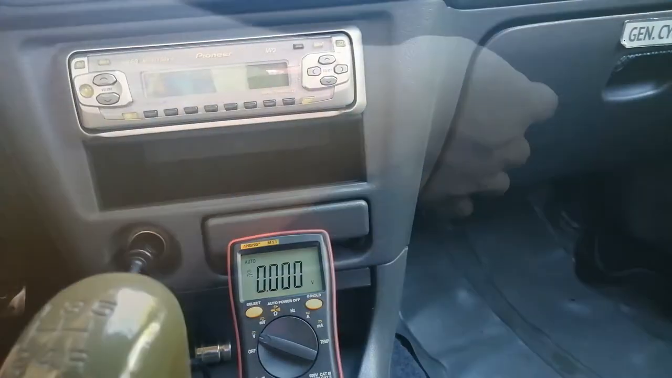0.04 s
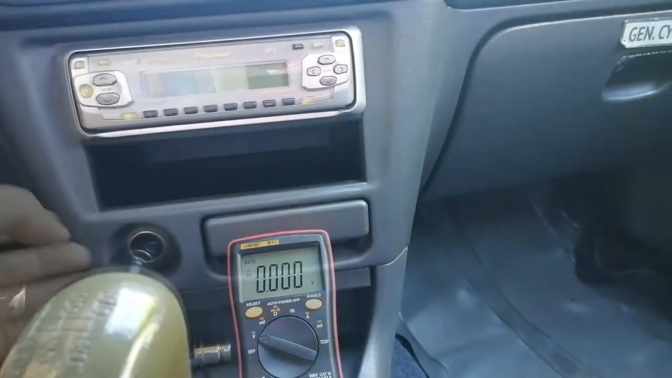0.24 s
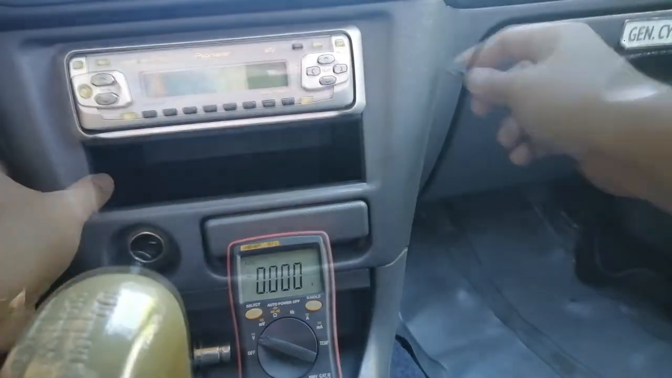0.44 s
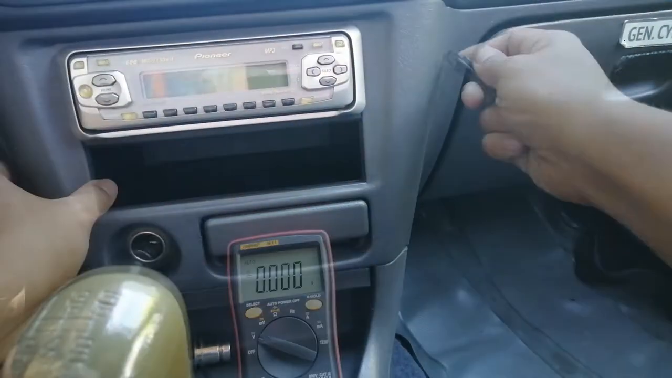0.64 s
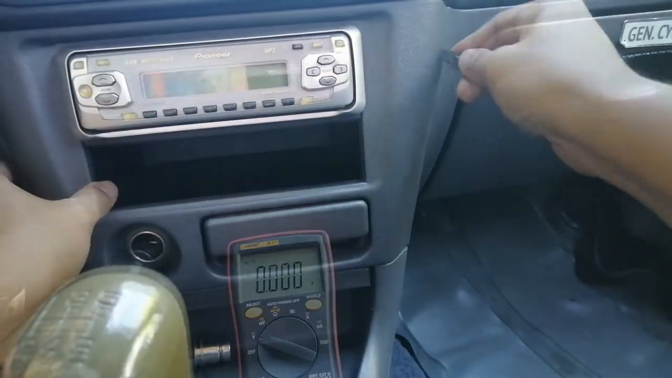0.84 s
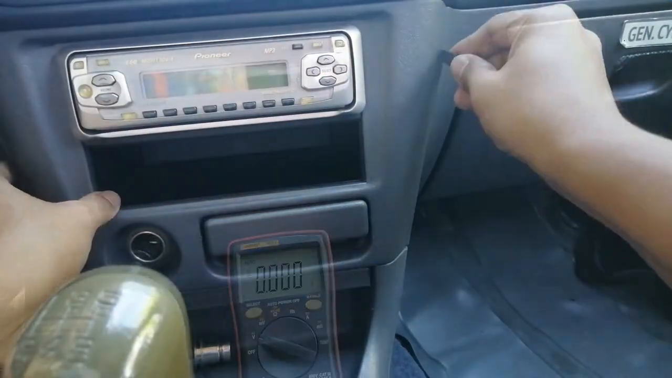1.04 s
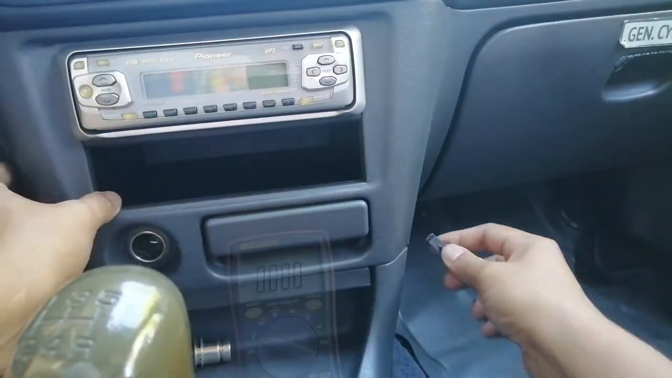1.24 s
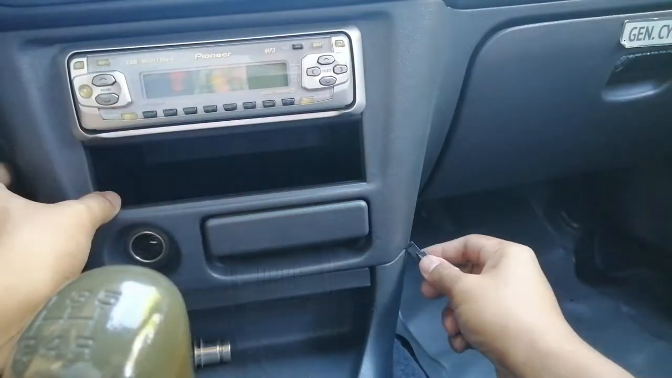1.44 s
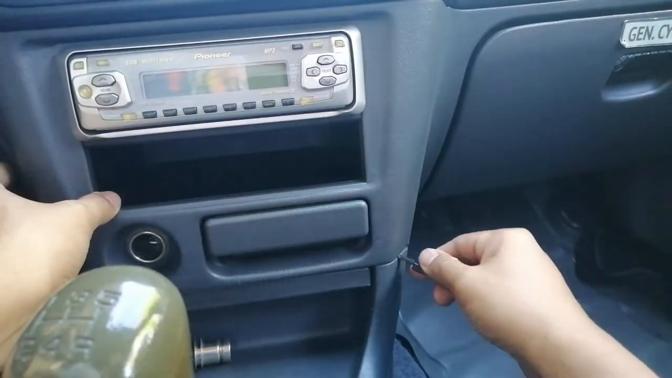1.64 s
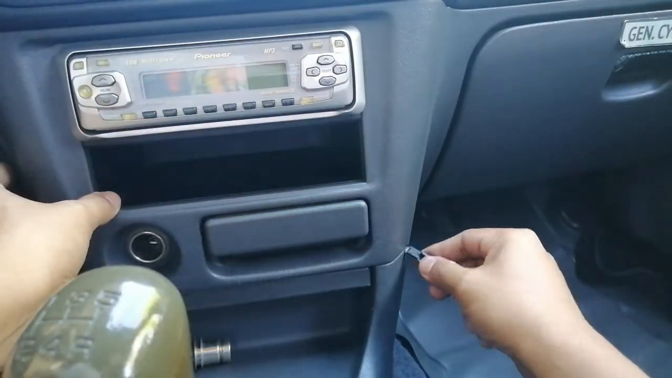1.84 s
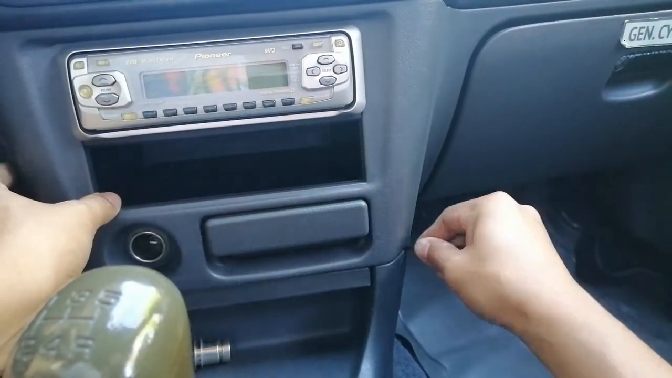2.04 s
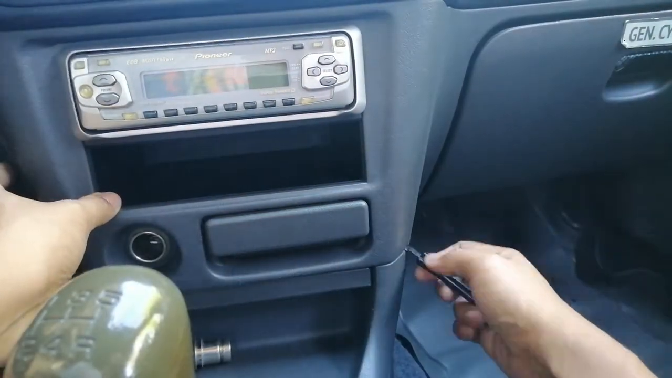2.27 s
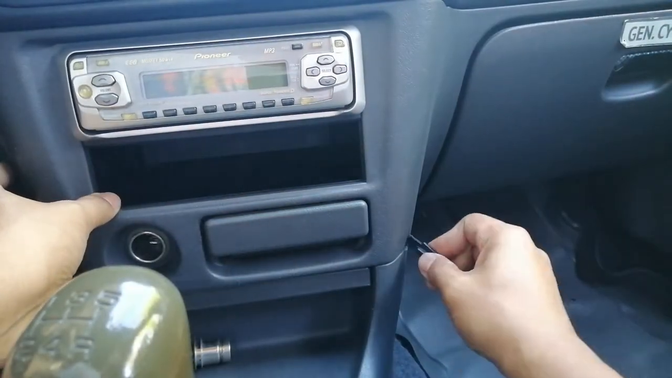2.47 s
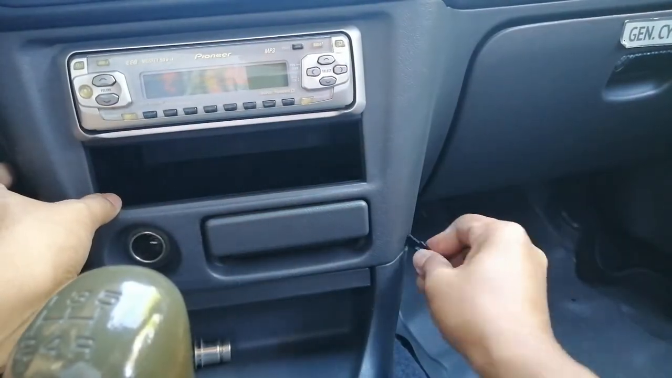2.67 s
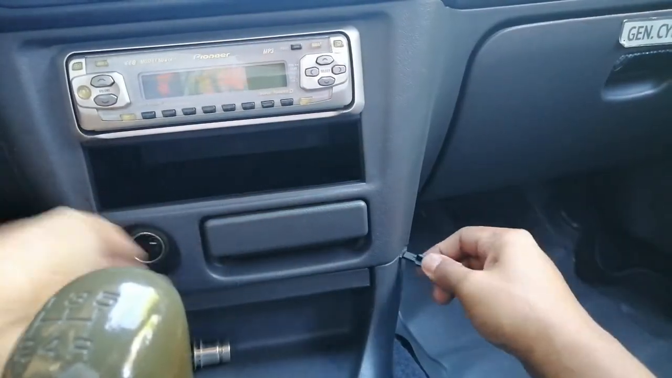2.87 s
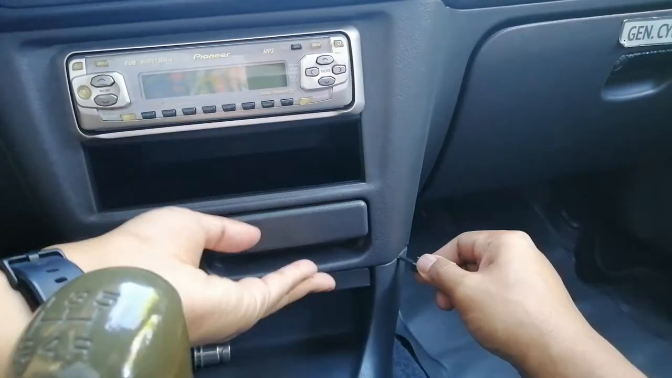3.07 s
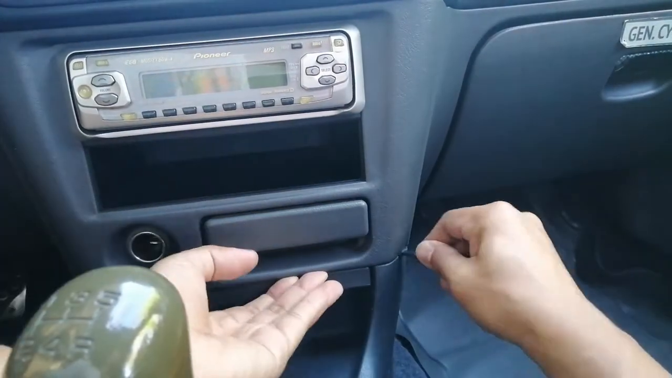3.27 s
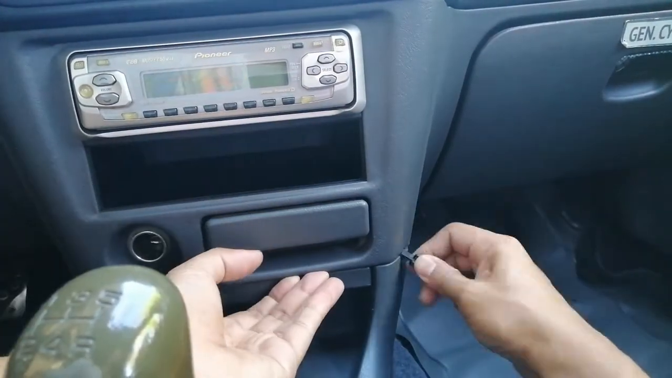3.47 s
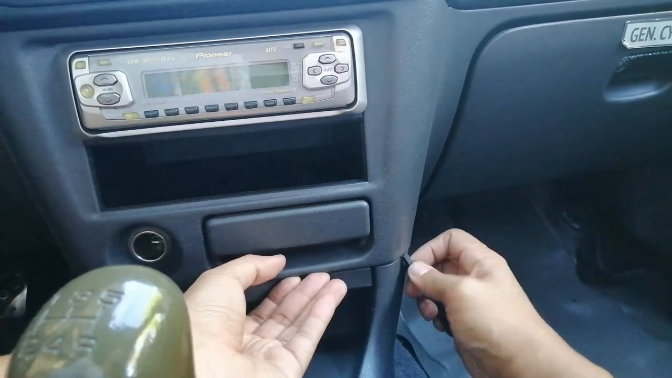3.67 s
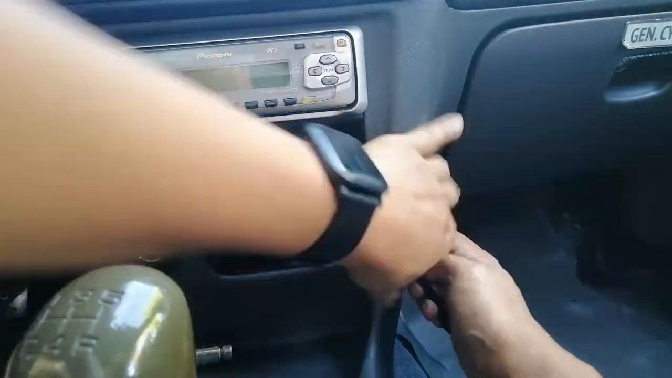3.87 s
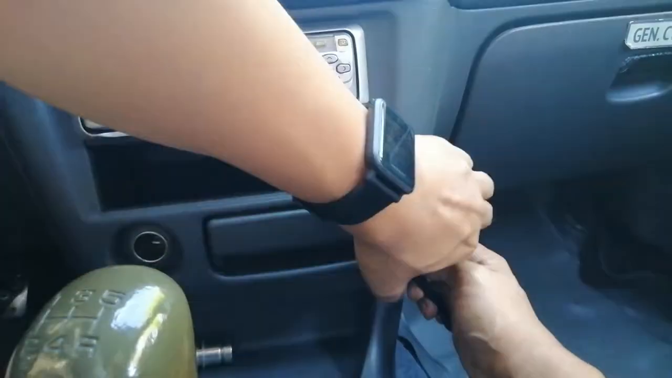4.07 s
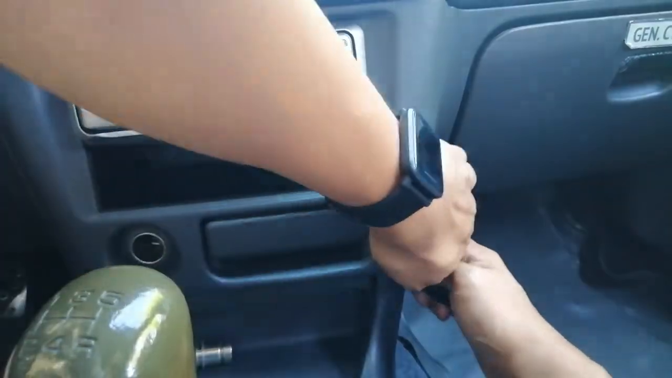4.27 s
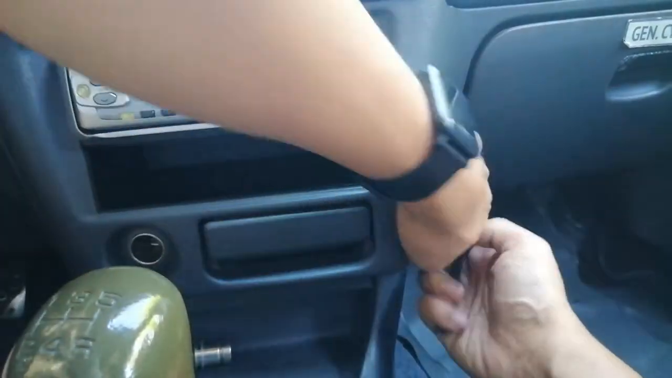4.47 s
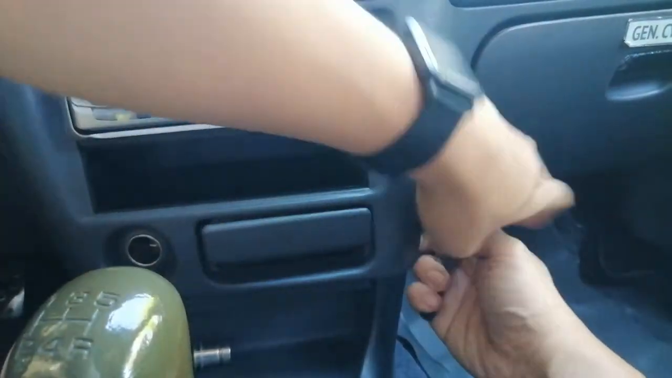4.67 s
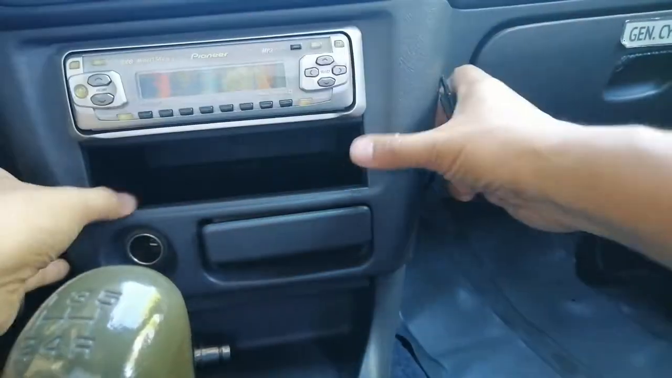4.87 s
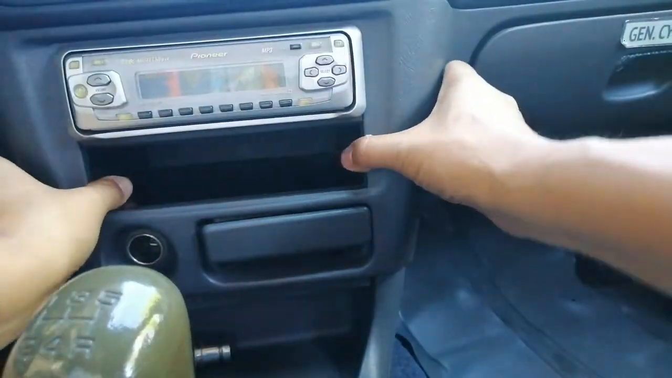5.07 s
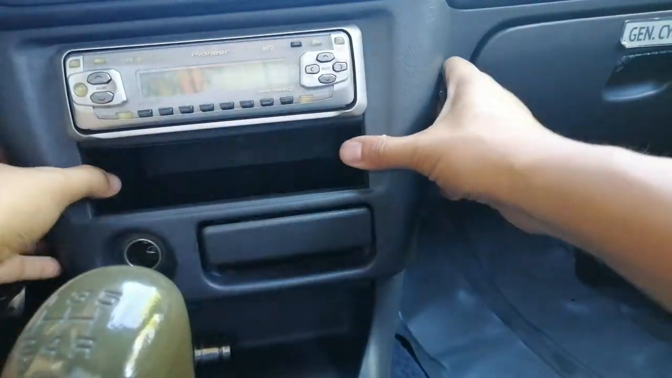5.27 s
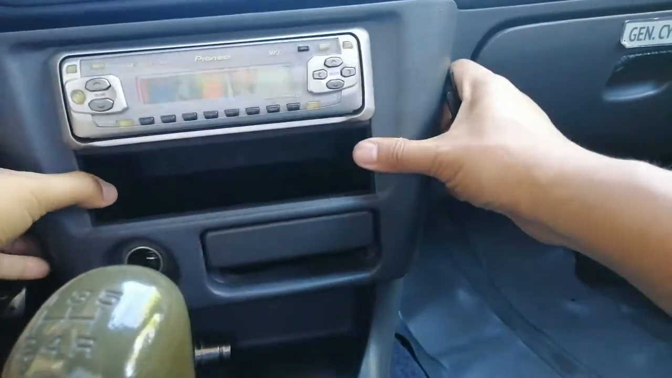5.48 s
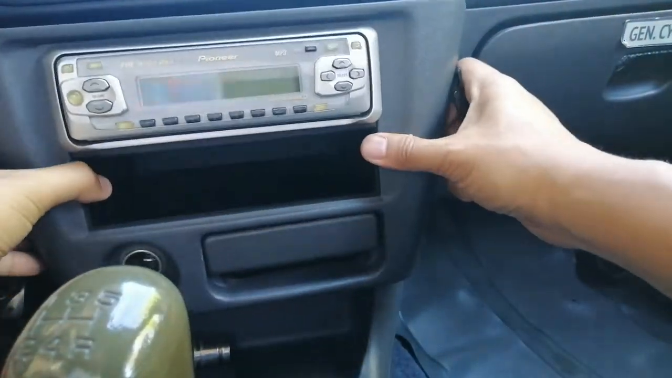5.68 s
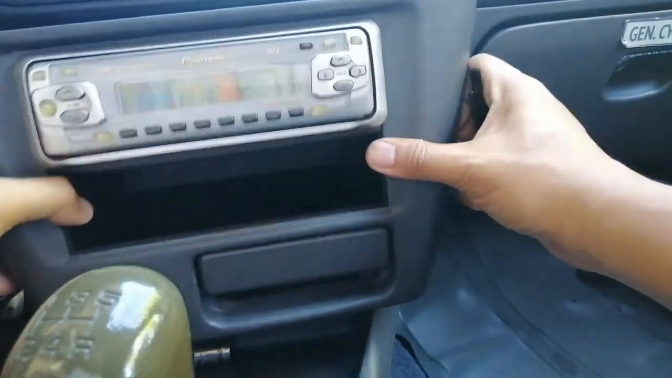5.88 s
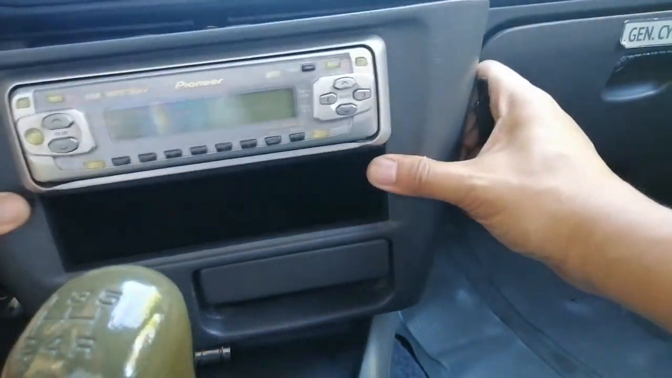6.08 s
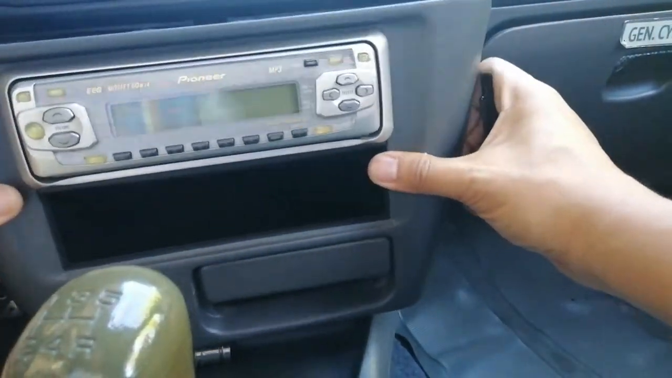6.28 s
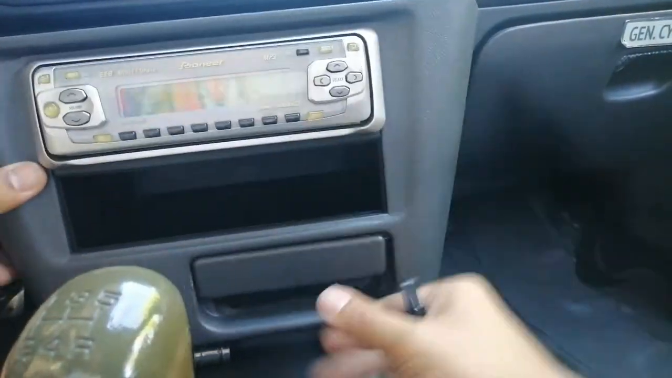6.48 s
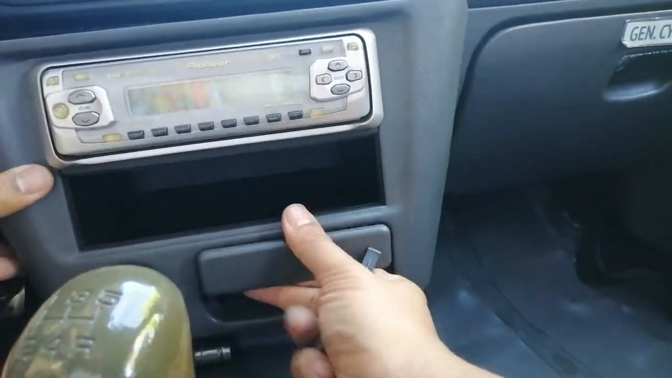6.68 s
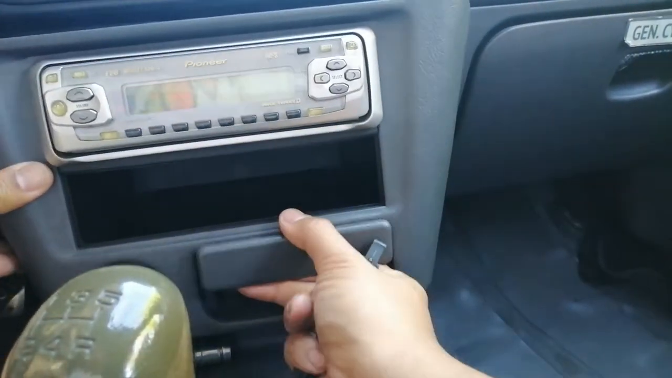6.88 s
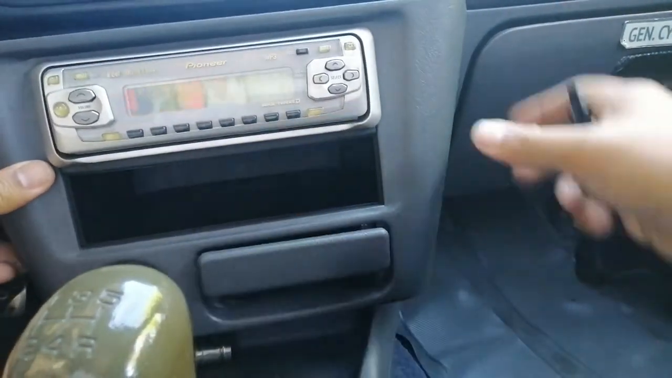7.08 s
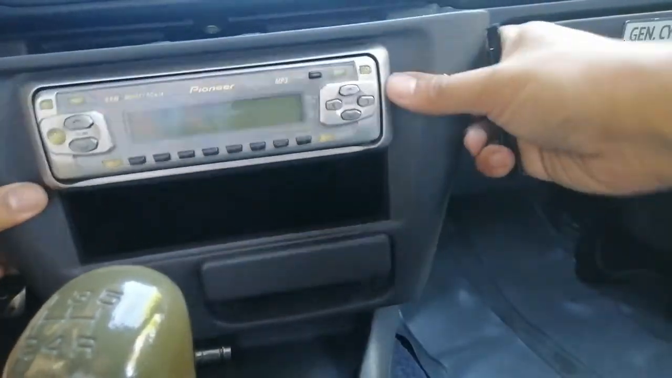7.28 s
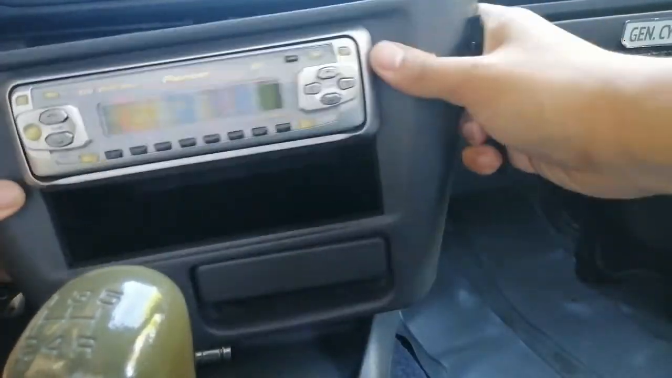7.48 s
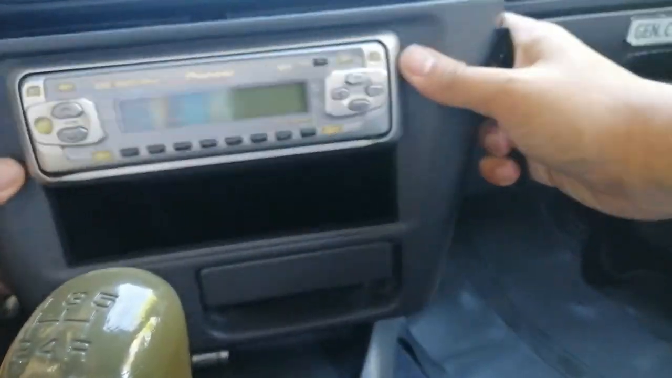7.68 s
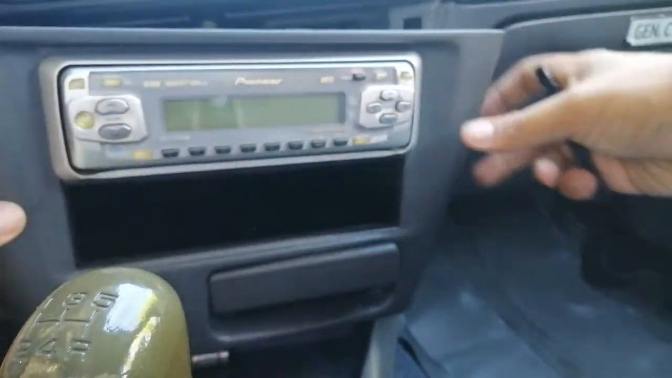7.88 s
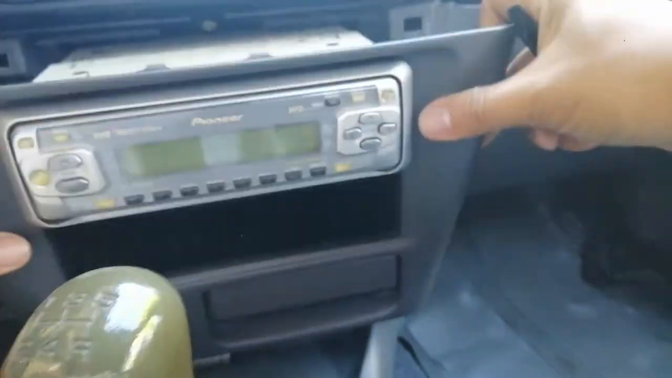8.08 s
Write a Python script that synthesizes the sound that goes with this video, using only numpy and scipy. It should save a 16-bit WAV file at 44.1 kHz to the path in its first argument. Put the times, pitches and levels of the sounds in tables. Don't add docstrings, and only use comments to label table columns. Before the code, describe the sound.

Faint cabin air fades to silence, then plastic trim knocks, cracks and pops free close by, rattling and rubbing in a small dry car interior.

```python
import sys
import numpy as np
from scipy import signal
from scipy.fft import rfft, irfft, next_fast_len
from scipy.io import wavfile
from scipy.ndimage import uniform_filter1d, map_coordinates

SR = 44100
rng = np.random.default_rng(int(sys.argv[2]) if len(sys.argv) > 2 else 0)


def ratio_of_db(decibels):
    return 10 ** (np.asarray(decibels, float) / 20)


def int16_out(signal):
    q = np.round(np.clip(np.atleast_2d(signal).T, -1, 1) * 32767)
    wavfile.write(sys.argv[1], SR, q.astype(np.int16))


N = 358091


def unit(x):
    return x / np.sqrt(np.mean(x ** 2, axis=-1, keepdims=True) + 1e-20)


def peak(x):
    return x / np.abs(x[:, :1]).max(axis=-1, keepdims=True)


def columns(rows):
    return np.transpose(rows)[..., None, None]


def laid(s, sounds):
    out = np.zeros((2, N + sounds.shape[-1]))
    for at, pair in zip(np.round(s * SR).astype(int), sounds):
        out[:, at:at + sounds.shape[-1]] += pair
    return out[:, :N]


def along(points, hz):
    f, v = np.transpose(points)
    return np.interp(np.log(hz + 1), np.log(f + 1), v)


def curves(rows):
    s, *cols = np.transpose(rows)
    return [np.interp(np.arange(N) / SR, s, c) for c in cols]


def wobble(rate):
    knots = rng.standard_normal(int(N * rate / SR) + 4)
    return map_coordinates(knots, [np.arange(N) * rate / SR])


def filtered(x, response):
    n = x.shape[-1]
    m = next_fast_len(n + min(4096, n // 2))
    return irfft(rfft(x, m) * response(np.fft.rfftfreq(m, 1 / SR)), m)[..., :n]


def ring(f, hz, width):
    return 1j * f * width / (hz * hz - f * f + 1j * f * width)


def modes(table, chance, spread_db, detune, widen=1):
    hz, width, db = np.transpose(table)
    k = len(table)
    hz = (hz * (1 + detune * chance[..., :k]))[..., None]
    sign = (-1) ** np.arange(k)
    gain = (sign * ratio_of_db(db + spread_db * chance[..., k:2 * k]))[..., None]
    width = widen * width[:, None]
    return lambda f: np.sum(gain * ring(f, hz, width), axis=-2)


def opposed(x):
    return np.array([x / 2, -x / 2])


# (frequency [Hz], likeness [0-1])
ALIKE = [(60, 0.63), (290, 0.5), (640, 0.86), (1400, 1), (3100, 0.31), (6800, 0.0081)]
# (frequency [Hz], left over right [dB])
LEAN = [(60, -3.5), (170, 1), (400, -2), (1300, 3.5), (2400, -3), (4400, -5.5), (8000, -0.2), (15000, -0.5)]
LAG_S = 2.5 / SR


def ports(a, b):
    turn = lambda hz: np.arccos(np.clip(along(ALIKE, hz), -1, 1)) / 2
    mid = filtered(a, lambda hz: np.cos(turn(hz)))
    side = filtered(b, lambda hz: np.sin(turn(hz)))
    balance = lambda hz: ratio_of_db(opposed(along(LEAN, hz))) * np.exp(2j * np.pi * opposed(hz * LAG_S))
    return filtered(np.array([mid + side, mid - side]), balance)


# (frequency [Hz], density [dB per Hz])
CABIN = [(15, -32), (25, 2.5), (600, -6.5), (1120, -11), (1390, -15.5), (1600, -10.5), (2980, -18.5),
         (15200, -24.5), (16500, -26)]
# (time [s], level [dB])
FADER = [
    (0, -78.5),
    (.45, -70.5),
    (.55, -79.5),
    (1.28, -86.5),
    (1.47, -106),
    (1.525, -125),
    (1.53, -70.5),
    (8.12, -65),
]
# (time [s], rumble level [dB], hand position as left over right [dB])
SWAY = [
    (0, -67, 2.5),
    (.45, -73, 3),
    (.55, -104, -3),
    (1.53, -99, 2.5),
    (3.35, -72, 4),
    (3.55, -56, 5),
    (3.75, -79, 1),
    (5.5, -68, -0.5),
    (8.12, -83.5, 1.5),
]


def cabin():
    t = np.arange(N) / SR
    air = unit(filtered(rng.standard_normal((2, N)), lambda hz: ratio_of_db(along(CABIN, hz))))
    sway = lambda hz: (hz / 30) ** 2 / (1 + (hz / 40) ** 6)
    rumble = unit(filtered(rng.standard_normal((2, N)), sway))
    whine_gain = ratio_of_db(np.interp(t, [.3, .42], [-92, -115])) * (t < .5)
    whine = whine_gain * np.sin(2 * np.pi * 12898 * t)
    silent = (t > 1.3) & (t < 1.53)
    air_gain = ratio_of_db(curves(FADER)[0])
    rumble_gain = ratio_of_db(curves(SWAY)[0] - 36 * silent)
    return ports(*(air_gain * air + rumble_gain * rumble)) + whine


# (frequency [Hz], time to fall 60 dB [s])
WALLS = [(150, 0.36), (1000, 0.078), (4000, 0.015), (12000, 0.016)]


def walls(x):
    hz, t, z = signal.stft(rng.standard_normal((2, SR // 4)), SR, nperseg=256)
    decay = ratio_of_db(-60 * t / along(WALLS, hz)[:, None])
    tail = signal.istft(z * decay, SR, nperseg=256)[1]
    late = np.pad(x, ((0, 0), (130, 0)))
    return signal.fftconvolve(late, tail / np.linalg.norm(tail[0]), axes=1)[:, :N]


# (frequency [Hz], width [Hz], level [dB])
DASH = [(126.2, 25, -2.5), (175, 17, 0.5), (242.6, 40, -7), (397.4, 39, -4)]


def dash(f):
    return modes(DASH, np.zeros(8), spread_db=0, detune=0)(f)


# (frequency [Hz], width [Hz], level [dB])
PANEL = [(565, 473, -4.5), (775, 123, 2), (900, 71, 1), (1202, 172, 0), (1500, 336, -2.5), (1790, 650, -4),
         (2320, 297, -3), (4180, 890, -14.5)]


def panel(chance, spread_db, detune, widen=1):
    return modes(PANEL, chance, spread_db, detune, widen)


# (frequency [Hz], density [dB per Hz])
EDGE = [(1470, -81), (2500, -5), (3320, -5), (7430, -4), (11800, -12.5), (14100, -12), (16000, -22),
        (16500, -63)]


def edge(f):
    return ratio_of_db(along(EDGE, f))


# (middle [s], swell [s], fall [s], level [dB])
DRAGS = [(2.071, 0.05, 0.013, -60.5), (2.47, 0.037, 0.024, -55.5), (3.19, 0.049, 0.035, -62),
         (3.227, 0.0071, 0.013, -48.5), (3.29, 0.06, 0.068, -55.5), (6.135, 0.0038, 0.013, -42),
         (2.272, 0.012, 0.012, -57), (4.346, 0.023, 0.01, -44), (4.46, 0.058, 0.029, -48.5),
         (4.568, 0.0074, 0.0065, -34), (4.787, 0.0068, 0.092, -50), (5.672, 0.033, 0.023, -46),
         (6.312, 0.02, 0.034, -51.5), (7.188, 0.046, 0.3, -53), (7.735, 0.032, 0.025, -51.5),
         (8.052, 0.047, 0.012, -39)]
# (middle [s], swell [s], fall [s], level [dB])
SCUFFS = [(4.708, 0.0088, 0.04, -55), (5.262, 0.062, 0.023, -49.5), (5.425, 0.042, 0.013, -38.5),
          (5.47, 0.031, 0.019, -44.5), (5.918, 0.024, 0.026, -38.5), (6.243, .012, 0.013, -48),
          (6.39, 0.0046, 0.049, -56), (6.559, 0.013, 0.019, -40), (6.699, 0.011, 0.026, -37.5),
          (6.819, 0.0053, 0.062, -65), (6.904, 0.052, 0.049, -51.5), (7.022, 0.0047, 0.006, -44),
          (7.288, 0.032, 0.008, -52), (7.334, 0.0071, 0.0079, -27), (7.455, 0.0064, 0.027, -53),
          (7.488, 0.019, 0.035, -45.5), (7.69, 0.0069, 0.0064, -47), (7.84, 0.051, 0.037, -53),
          (8.025, 0.0086, 0.021, -61), (7.771, 0.016, 0.005, -39), (7.903, 0.1, 0.0073, -51)]
# (middle [s], swell [s], fall [s], level [dB])
BRUSHES = [
    (5.807, 0.022, 0.018, -59),
    (.44, 0.058, 0.053, -78.5),
    (7.559, 0.0096, 0.0038, -49),
]
DRAG_HISS_DB, SCUFF_HISS_DB, BRUSH_HISS_DB = -13, -5.5, 13


def strokes():
    t, gains = np.arange(N) / SR, np.zeros((2, N))
    for rows, hiss_db in (DRAGS, DRAG_HISS_DB), (SCUFFS, SCUFF_HISS_DB), (BRUSHES, BRUSH_HISS_DB):
        for s, swell, fall, db in rows:
            near = slice(max(0, round((s - 3 * swell) * SR)), round((s + 3 * fall) * SR))
            u = (t[near] - s) / np.where(t[near] < s, swell, fall)
            gains[:, near] += ratio_of_db([[db], [db + hiss_db]]) * ratio_of_db(-8 * np.abs(u) ** 1.99)
    return gains


def patchy(x, depth_db):
    z = signal.stft(x, nperseg=256)[2]
    field = uniform_filter1d(rng.standard_normal(z.shape[1:]), 3, 0)
    field = uniform_filter1d(field, 12, 1)
    return signal.istft(z * ratio_of_db(depth_db * field / field.std()), nperseg=256)[1][:, :N]


def slips(rate, t60):
    released = np.floor(np.cumsum(rate * ratio_of_db(8.2 * wobble(30)) / SR))
    kicks = np.diff(released, prepend=0) * ratio_of_db(2.5 * rng.standard_normal(N))
    return signal.lfilter([1], [1, -ratio_of_db(-60 / (t60 * SR))], kicks)


# (time [s], drag of the fingers [dB], bending force [dB])
RUB = [(0, -56.5, -80), (.42, -94, -79), (.52, -104, -86.5), (1.52, -106, -108), (1.73, -78, -82),
       (3.16, -57, -75), (3.33, -60, -68), (3.99, -56.5, -70), (4.45, -54.5, -68), (4.94, -49, -75),
       (5.37, -57, -62), (5.68, -58.5, -61.5), (5.81, -57, -55), (5.97, -49.5, -65.5), (6.61, -45.5, -56.5),
       (7.13, -90, -73), (7.42, -70, -61), (8.12, -42.5, -73)]


def rubbing():
    drag_db, flex_db = curves(RUB)
    stroke_gain, stroke_hiss_gain = strokes()
    clumps = (.8 + slips(rate=200, t60=.022)) * ratio_of_db(3 * wobble(600))
    grit = lambda: rng.standard_normal((2, N))
    scraped = filtered(grit() * clumps, panel(np.zeros(16), spread_db=0, detune=0, widen=1.27))
    scrape = unit(patchy(scraped, depth_db=3.5))
    hiss = unit(patchy(filtered(grit(), edge), depth_db=-2.0) * clumps ** 0.82)
    flex = unit(filtered(grit() * ratio_of_db(1.7 * wobble(18)), lambda hz: dash(hz) / (1 + 1j * hz / 400)))
    scrape_gain = ratio_of_db(drag_db - 10.5) + stroke_gain
    hiss_gain = ratio_of_db(drag_db - 18.5) + stroke_hiss_gain
    flex_gain = ratio_of_db(flex_db + 4.0) + 0.18 * stroke_gain
    return scrape_gain * scrape + hiss_gain * hiss + flex_gain * flex


# (time [s], peak [dB], ring [Hz])
PULLS = [(.004, -50, 185), (0.417, -49, 379), (1.008, -49.5, 162), (1.989, -49, 143), (2.288, -29, 266),
         (2.712, -48.5, 122), (3.444, -35, 200), (3.47, -43, 129), (3.53, -50, 109), (3.858, -36, 232),
         (3.875, -30.5, 129), (3.902, -35, 121), (3.93, -44, 127), (4.169, -20.5, 269), (4.34, -36, 372),
         (4.562, -20, 194), (4.578, -29, 160), (4.618, -34, 112), (4.884, -35.5, 150), (5.048, -41, 306),
         (5.132, -25.5, 175), (5.239, -32.5, 185), (5.393, -26, 256), (5.482, -31.5, 156),
         (5.601, -27, 178), (5.813, -29.5, 195), (5.907, -34.5, 160), (6.177, -37, 195),
         (6.532, -36.5, 144), (6.683, -24.5, 229), (7.257, -44, 207), (7.338, -30, 154), (7.69, -32, 175),
         (7.767, -37, 207), (7.902, -38, 440), (2.288, -31, 165)]
BOOM_CYCLES = 11.8


def thuds():
    s, db, hz = columns(PULLS)
    t = np.arange(8192) / SR
    swell = 1 - np.exp(-t / 0.00077)
    decay = ratio_of_db(-60 * t / np.clip(BOOM_CYCLES / hz, .01, .3))
    push = rng.standard_normal((len(s), 2, len(t))) * swell * decay
    push = push + 0.55 * t / 0.0017 * np.exp(1 - t / 0.001)
    soft = lambda f: 1 / (1 + 1j * f / 450) / (1 + 105 / (1j * f + 1)) ** 2
    boom = filtered(push, lambda f: (dash(f) + ratio_of_db(11) * ring(f, hz, 36.8)) * soft(f))
    return laid(s[:, 0, 0], ratio_of_db(db) * peak(boom))


# (time [s], pitch [Hz], level [dB], time to fall 60 dB [s])
CLIPS = [
    (2.289, 6700, -55, 0.15),
    (2.2895, 1780, -23, 0.028),
    (5.478, 975, -38, 0.13),
    (7.3452, 880, -14.5, 0.024),
    (7.341, 680, -21, 0.025),
    (7.345, 8700, -42, 0.065),
    (2.287, 1200, -50, 0.24),
    (7.345, 3320, -50, 0.19),
]
# (time [s], pitch [Hz], level [dB], time to fall 60 dB [s])
FLEXES = [(.498, 1590, -52, 0.031), (2.29, 1160, -25.5, 0.03), (2.29, 3810, -17, 0.018),
          (3.447, 1094, -28, 0.023), (3.447, 316, -27, 0.042), (4.17, 1820, -20, 0.034),
          (4.171, 2250, -22, 0.039), (4.565, 165.6, -28, 0.17), (5.396, 2250, -22, 0.054),
          (5.398, 782, -25.5, 0.082), (5.45, 2110, -23, 0.034), (6.401, 1210, -24, 0.036),
          (4.564, 552, -26, 0.056), (4.564, 1153, -23.5, .03), (3.447, 883, -21.5, .03),
          (5.137, 1166, -27, .03), (4.172, 540, -32.5, 0.16)]


def springs():
    s, hz, db, t60 = columns(CLIPS + FLEXES)
    t = np.arange(8192) / SR
    tone = ratio_of_db(db - 60 * t / t60) * np.sin(2 * np.pi * hz * t)
    return laid(s[:, 0, 0], tone * [[1], [.4]])


# (middle [s], half length [s], peak [dB], ring [Hz], slips [per s])
RASPS = [
    (1.127, 0.025, -49.5, 1150, 160),
    (2.866, 0.03, -44, 1890, 135),
    (3.33, 0.032, -37, 1500, 170),
    (5.915, 0.017, -29, 3050, 280),
    (3.262, 0.047, -51, 1590, 110),
    (3.913, .04, -52.5, 2500, 180),
    (7.34, 0.0098, -13.5, 2700, 410),
]
# (middle [s], half length [s], peak [dB], ring [Hz], slips [per s])
SQUEAKS = [
    (4.895, 0.0082, -23, 1870, 399.5),
    (5.659, 0.024, -35.5, 2470, 201),
    (5.652, 0.017, -37, 4750, 300),
    (5.809, 0.012, -28, 2180, 162.4),
    (6.462, 0.011, -31.5, 4590, 162),
    (7.624, 0.008, -37, 4100, 300),
    (7.63, 0.015, -40.5, 1540, 250.5),
    (8.02, 0.014, -31, 5640, 200.5),
]
RASP_WIDTH, SQUEAK_WIDTH = .45, 0.086


def creaks():
    s, half, db, hz, per_s = columns(RASPS + SQUEAKS)
    relative = np.array([RASP_WIDTH] * len(RASPS) + [SQUEAK_WIDTH] * len(SQUEAKS))[:, None, None]
    width = hz * relative
    t = np.arange(6144) / SR - .06
    grit = rng.standard_normal((len(s), 2, len(t)))
    pace = 1 + 0.28 * unit(uniform_filter1d(grit[:, :1], size=300))
    since = np.cumsum(per_s * pace / SR, axis=-1) % 1
    rub = grit * (.12 + ratio_of_db(-40 * since))
    slip = filtered(rub, lambda f: ring(f, hz, width) ** 2 + 0.13 * relative * edge(f))
    swell = np.cos(np.clip(t / half, -1.5, 1.5) * np.pi / 3) ** 2
    return laid(s[:, 0, 0] + t[0], ratio_of_db(db) * peak(slip * swell))


# (time [s], peak [dB], centre [Hz], time to fall 60 dB [s])
CRACKS = [(2.2893, -17, 8670, .012), (3.447, -14.5, 9400, 0.015), (3.974, -28, 11500, 0.026),
          (4.148, -23, 9500, .025), (4.167, -29, 12000, .02), (4.17, -24, 10000, .025),
          (5.3945, -26, 14000, .025), (5.398, -15, 7500, 0.031), (5.447, -14.5, 13900, 0.026),
          (5.4507, -14.5, 7500, 0.0207), (5.845, -16.5, 4760, 0.019), (5.903, -25, 12000, .02),
          (5.971, -35, 13500, .02), (6.184, -43, 8000, 0.018), (7.331, -29, 12000, 0.022),
          (7.3374, -19, 14000, .015)]


def cracks():
    s, db, hz, t60 = columns(CRACKS)
    t = np.arange(2048) / SR
    shape = (1 - np.exp(-t / 0.00033)) * ratio_of_db(-60 * t / np.clip(t60, .004, .05))
    burst = rng.standard_normal((len(s), 2, len(t))) * [[1], [.4]] * shape
    bright = filtered(burst, lambda f: ring(f, hz, 0.15 * hz) + .2 * f / (f + 3000))
    return laid(s[:, 0, 0], ratio_of_db(db) * peak(bright))


# (time [s], peak [dB], tick [dB], time to fall 60 dB [s], loudest ring [Hz])
SNAPS = [(2.29, -13, -7, 0.023, 2070), (3.447, -18.5, -5, 0.03, 1100), (4.15, -28.5, -1.5, 0.042, 1380),
         (4.169, -11, -13.5, 0.039, 1150), (4.563, -14, -16, 0.048, 900), (5.137, -16.5, -11, 0.049, 1055),
         (5.394, -15.5, -3.5, 0.064, 1250), (5.417, -20, 1.5, 0.067, 1300), (5.448, -20, 7, 0.043, 1010),
         (5.844, -25.5, 2.5, 0.052, 800), (5.97, -22.5, -0.5, 0.03, 2910), (6.37, -27.5, -7.5, 0.075, 2240),
         (6.4, -17.5, -17, 0.023, 915), (6.411, -17.5, -17.5, 0.039, 803), (6.682, -22.5, -5.5, 0.055, 620),
         (6.703, -19, -14, 0.018, 1250), (7.341, -14.5, -5, 0.016, 900), (7.345, -15, -0.5, 0.03, 2440),
         (7.693, -24.5, -9.5, 0.036, 930), (7.775, -23.5, -9.5, 0.05, 2750),
         (7.954, -32, -8.5, 0.088, 2470), (8.047, -30, 0.5, 0.071, 1110)]
# (time [s], peak [dB], loudest ring [Hz])
KNOCKS = [(0.413, -49.5, 426), (0.497, -49, 900), (0.573, -59, 1390), (0.769, -58.5, 860),
          (.999, -45.5, 764), (1.625, -38.5, 1640), (1.899, -49, 1080), (1.991, -43, 845),
          (2.108, -53, 1040), (2.202, -38, 910), (2.429, -41, 1500), (2.828, -48.5, 1740),
          (3.125, -46.5, 940), (3.222, -35.5, 884), (3.637, -43.5, 740), (3.695, -35.5, 2320),
          (3.739, -41.5, 2250), (3.859, -41, 1800), (3.875, -35.5, 2450), (4.282, -34.5, 810),
          (4.3, -33.5, 1260), (4.324, -34.5, 790), (4.392, -49, 850), (4.551, -27.5, 1120),
          (5.049, -27.5, 433), (6.53, -37.5, 680), (6.898, -42, 1060), (7.134, -39, 1250),
          (8.061, -34, 1150)]
# (time [s], peak [dB], loudest ring [Hz])
RATTLES = [(0.016, -48, 477), (0.044, -49, 550), (.555, -57, 1830), (0.676, -50.5, 1185),
           (.745, -39.5, 1610), (0.965, -59, 1500), (1.131, -50, 1510), (1.772, -49, 1050),
           (2.036, -51.5, 920), (2.387, -38, 1860), (2.918, -34, 1760), (2.998, -48, 1790),
           (3.381, -39.5, 600), (3.412, -40.5, 840), (3.508, -38.5, 1090), (3.52, -43, 1150),
           (4.076, -36.5, 815), (4.415, -39.5, 860), (4.623, -34, 900), (4.642, -33, 2020),
           (4.744, -37, 1670), (5.081, -38, 1167), (5.238, -34.5, 1480), (5.929, -32, 950),
           (6.211, -35.5, 2230), (6.219, -31, 650), (6.303, -33.5, 710), (7.018, -36, 990),
           (7.553, -34, 836)]
# (time [s], peak [dB], tick [dB])
TICKS = [(3.973, -46, 8.5), (4.451, -33, -3.5), (4.465, -33.5, -5.5), (4.699, -47.5, 11), (4.782, -39.5, 0),
         (5.178, -59.5, 24.5), (5.254, -36, -3), (5.264, -41, 8.5), (5.481, -34.5, 10.5),
         (5.593, -36.5, -1.5), (5.705, -39, 6.5), (5.9, -44.5, 19.5), (6.039, -47, 16), (6.123, -41, 11.5),
         (6.181, -40.5, 9), (6.637, -35.5, 2.5), (6.803, -40, -2), (7.449, -52, 15), (7.619, -37.5, 6.5),
         (7.754, -40.5, 2), (7.875, -50, 16), (7.895, -37, 4), (8.009, -45, 10.5)]
# (time [s], peak [dB], tick [dB], ring [Hz])
CRACKLES = [(2.459, -39, -11, 1920), (2.528, -62, 1, 694), (2.632, -51, -19, 2520), (2.69, -54, -10.5, 939),
            (2.706, -45.5, -28, 925), (2.855, -45.5, -17, 660), (3.04, -52.5, -14, 885),
            (3.167, -51, -24, 880), (3.183, -45.5, -14, 1610), (3.278, -43, -26, 1690),
            (3.303, -43, -9, 1500), (3.328, -39, -9, 1300), (3.548, -48, -6.5, 1270),
            (3.595, -46.5, -38, 2340), (3.678, -56, -12, 2140), (3.764, -46, -9, 1140),
            (3.902, -46, -26, 2300), (3.964, -40, -17, 920), (4.066, -49, -16, 795), (5.554, -57, 0, 1200),
            (5.637, -44, -5, 4810), (5.719, -36, -18, 900), (5.782, -37.5, -13, 2510),
            (5.823, -35, 0.5, 2220), (5.869, -31.5, -7, 988), (6.013, -50, 2, 965), (6.083, -47, -14, 880),
            (6.093, -53.5, 13.5, 2880), (6.138, -44, 1, 900), (6.242, -50, 6, 1010), (6.314, -39, -15, 884),
            (6.495, -53, 2, 743), (6.552, -41.5, 0, 1340), (6.602, -40, -9, 1250), (6.785, -46.5, -8, 780),
            (6.818, -36, -10, 2700), (6.845, -40.5, -1, 700), (7.004, -42, -9, 915), (7.21, -49.5, 0, 1126),
            (7.263, -38, -15, 1125), (7.291, -39, 3.5, 2530), (7.466, -36.5, 3, 5470),
            (7.56, -32.5, 1.5, 860), (7.689, -26.5, -12, 960), (7.709, -27.5, -21, 2350),
            (7.821, -41, -9, 2430), (7.848, -40, -6, 2400), (7.863, -40, 1.5, 2400), (8.033, -39, 2, 1230),
            (8.103, -45.5, -4, 2530)]
# (time [s], peak [dB], tick [dB], ring [Hz])
MORE_CRACKLES = [(4.395, -42, -15, 1600), (4.43, -47, -6, 2400), (4.535, -59, 2, 1110),
                 (4.683, -52, -14, 2500), (4.716, -41, 2, 1960), (4.93, -61, -10, 1800),
                 (5.195, -50, -12, 1100), (5.431, -26, 0, 2300), (6.565, -34, -4, 4040), (6.58, -40, -14, 900),
                 (6.735, -42, -5, 1010), (6.945, -46, -3, 806), (6.966, -48.5, -5, 900),
                 (7.246, -42, -14, 1100)]
KNOCK_TICK_DB, KNOCK_T60 = -22.5, 0.061
RATTLE_TICK_DB, RATTLE_T60 = -10, 0.061
TICK_T60, TICK_RING_HZ = 0.055, 1200
CRACKLE_T60 = 0.04


def contacts():
    knocks = [(s, db, KNOCK_TICK_DB, KNOCK_T60, hz) for s, db, hz in KNOCKS]
    rattles = [(s, db, RATTLE_TICK_DB, RATTLE_T60, hz) for s, db, hz in RATTLES]
    ticks = [(s, db, tick_db, TICK_T60, TICK_RING_HZ) for s, db, tick_db in TICKS]
    crackles = [(s, db, tick_db, CRACKLE_T60, hz) for s, db, tick_db, hz in CRACKLES + MORE_CRACKLES]
    return SNAPS + knocks + rattles + ticks + crackles


def snaps():
    s, db, tick_db, t60, hz = columns(contacts())
    lead = .006
    t = np.arange(2432) / SR - lead
    n = len(t)
    draw = rng.standard_normal((len(s), 2, 2 * n + 16))
    shake, grit, chance = draw[..., :n], draw[..., n:-16], draw[:, :1, -16:]
    life = np.clip(t60, .006, .15)
    strain = ratio_of_db(-14.5 + 60 * t / 0.0099)
    start = np.where(t < 0, strain, 1 - .5 * np.exp(-np.abs(t) / 0.00078))
    blow = 11 * (np.arange(n) == round(lead * SR) + 8)
    t = np.maximum(t, 0)

    struck_panel = panel(chance, spread_db=3.0, detune=0.049)
    soft_hz = 4500 * ratio_of_db(0.88 * (tick_db + 20.5))
    spot = lambda f: ratio_of_db(7.5) * ring(f, hz, 0.092 * hz)
    body_response = lambda f: (struck_panel(f) + spot(f)) / (1 + 1j * f / soft_hz) ** 2
    body = filtered((shake + blow) * start * ratio_of_db(-60 * t / (0.83 * life)), body_response)

    glint_hz = 7200 * ratio_of_db(2.77 * chance[..., :1])
    tick_response = lambda f: edge(f) * (0.52 + 0.22 * (f / 12000) ** 2 + ring(f, glint_hz, 2100))
    tick_decay = ratio_of_db(-60 * t / (0.52 * life)) + 0.11 * ratio_of_db(-60 * t / life)
    tick = filtered(grit * np.abs(shake) ** 0.5 + 0.42 * blow, tick_response) * start * tick_decay
    return laid(s[:, 0, 0] - lead, ratio_of_db(db) * (peak(body) + ratio_of_db(tick_db + 5) * peak(tick)))


def scene():
    hits = ports(*(rubbing() + thuds() + springs() + creaks() + snaps() + cracks()))
    hands = hits + ratio_of_db(-17.0) * walls(hits)
    hand_db = curves(SWAY)[1] - 0.5
    return hands * ratio_of_db(opposed(hand_db)) + cabin()


def band_limit(x):
    return signal.sosfilt(signal.butter(12, 16810, fs=SR, output="sos"), x)


def record(dry):
    mix = filtered(dry, lambda hz: hz < 16300)
    return band_limit(mix)


dry = scene()
out = record(dry)
int16_out(out)
```